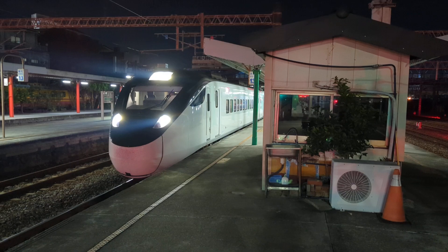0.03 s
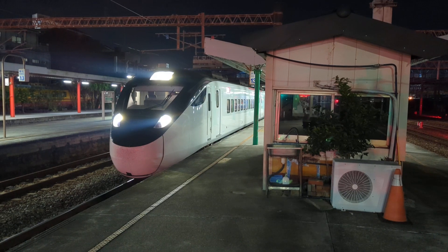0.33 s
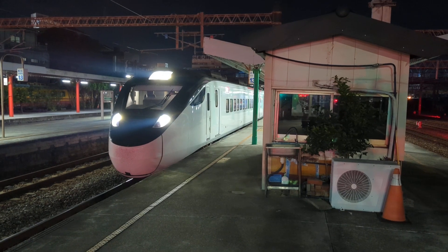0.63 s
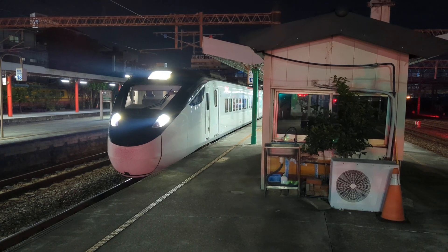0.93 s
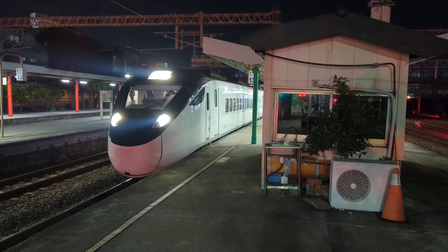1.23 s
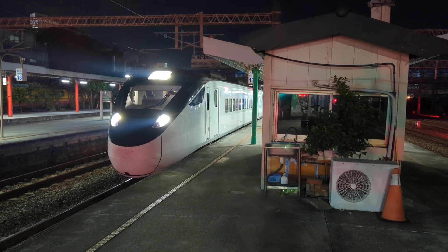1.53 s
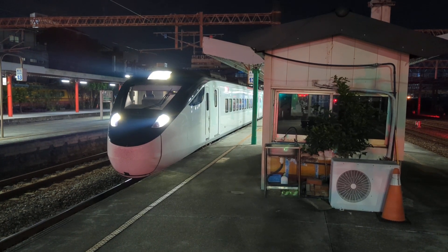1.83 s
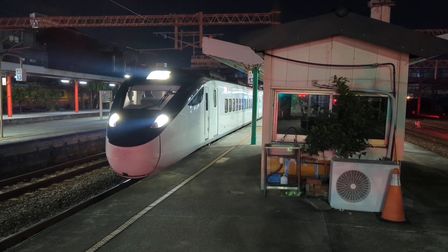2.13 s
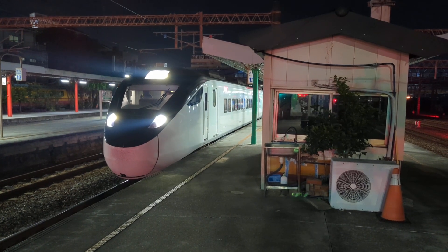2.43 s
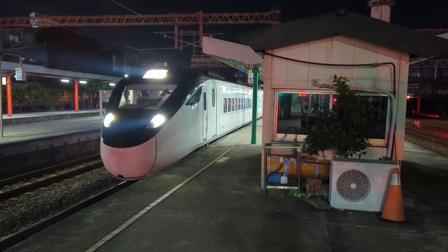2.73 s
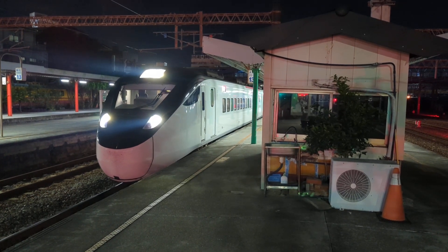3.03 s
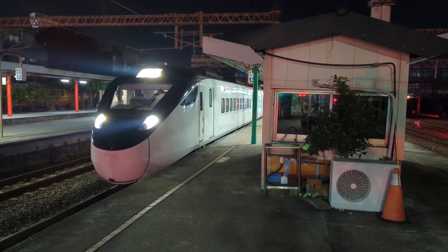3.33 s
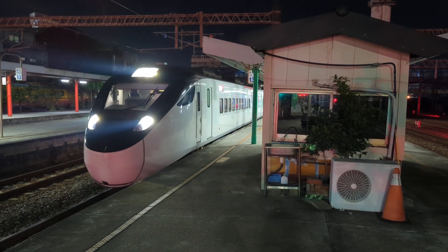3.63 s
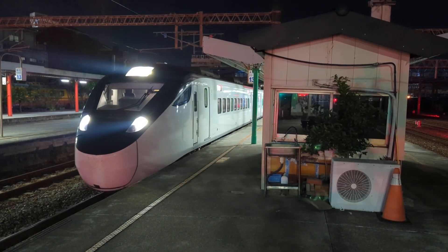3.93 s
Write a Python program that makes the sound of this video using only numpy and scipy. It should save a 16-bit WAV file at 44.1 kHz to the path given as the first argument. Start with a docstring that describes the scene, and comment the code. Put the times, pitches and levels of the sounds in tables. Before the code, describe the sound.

An electric train rumbles and hums at a platform, its cooling fans rushing throughout. A thin air leak starts near 0.8 seconds. At about 1.7 seconds the brakes release in a bright hiss with falling whistles, joined by brief high squeals and a light echo, fading by 2.8 seconds. A soft whine swells around 3 seconds, a small hiss follows near 3.4, and an insect pulses very faintly behind everything.

```python
"""First comes the rumble and hum of an electric train, starting to pull away from a night platform.
A fine leak of air opens, then the brakes release in a hiss full of whistles that fall with the pressure.
A few high squeals ring on in the brake gear, and the platform roof answers whistles and squeals.
Behind it all, cooling fans rush, a whine swells and an insect chirps beside the track."""
import sys
import numpy as np
from scipy import signal
from scipy.fft import rfft, irfft, next_fast_len
from scipy.io import wavfile
from scipy.ndimage import uniform_filter1d, map_coordinates

SR = 44100
rng = np.random.default_rng(int(sys.argv[2]) if len(sys.argv) > 2 else 0)


def store_wav(level_fs):
    """Save 16-bit WAV to argv[1]."""
    pcm = np.round(np.clip(np.atleast_2d(level_fs), -1, 1) * 32767)
    wavfile.write(sys.argv[1], SR, pcm.T.astype(np.int16))


N = 176400

# Tone colour of each noise layer: frequency_hz, relative_db
JET_COLOUR = [(2500, -6), (4000, -19), (5200, -23), (6200, 1), (7200, 2.5), (7900, -11), (8900, -0.5),
              (9700, -22), (15000, -11)]
SPRAY_COLOUR = [(2500, -8), (3700, 3), (4400, 4.5), (5500, 8.5), (8000, -3), (10200, 0.5), (11200, 2),
                (13500, 4), (15500, -12)]
LEAK_COLOUR = [(3000, -10), (6000, 2.5), (8500, 1.5), (9700, -1), (10250, 4), (10800, -4.5), (11500, -2),
               (12200, -4), (13800, -4), (15000, 5.5), (15800, -9)]
RUMBLE_COLOUR = [(38, -5.5), (52, -10.5), (85, -8), (115, -2.5), (150, -7.5), (180, -3), (225, -6),
                 (260, -7.5), (350, -11), (400, -16), (470, -18.5), (550, -26), (800, -37), (1500, -80)]
FAN_COLOUR = [(450, -10), (560, -8), (780, -3), (1060, -3.5), (1530, -9.5), (1850, -4.5), (2120, -4),
              (2400, -11.5), (2850, -15.5), (3600, -21), (4300, -18.5), (5400, -32.5), (7800, -35),
              (13000, -70)]
HISS_COLOUR = [(3000, -44), (5400, -13.5), (6300, -0.5), (7200, 4.5), (7900, -11.5), (8700, -9),
               (9500, -14), (11000, -18.5), (15500, -20)]
# Fader ride of each layer, ahead of any trim: time_s, level_db
JET_RIDE = [(1.55, -78), (1.68, -50.5), (1.77, -42), (1.9, -40.5), (2.15, -45.5), (2.3, -51), (2.55, -58.5),
            (2.85, -65)]
SPRAY_RIDE = [(1.68, -80), (1.8, -53.5), (2.0, -45), (2.15, -44), (2.3, -50.5), (2.55, -60.5), (2.8, -69)]
LEAK_RIDE = [(.8, -73), (.87, -64), (1.25, -59), (1.65, -57.5), (2.3, -71), (2.7, -64), (3.28, -76),
             (3.36, -62.5), (3.5, -67), (3.65, -84), (4, -80)]
RUMBLE_RIDE = [(0.12, -44), (0.17, -45), (0.63, -46), (0.76, -45), (3.94, -42.5), (4.0, -44.5)]
FAN_RIDE = [(0.12, -54), (0.14, -52), (1.21, -49), (3.85, -47.5), (4.0, -48)]
MOTOR_RIDE = [(.1, -52), (.75, -50), (1.0, -43), (1.27, -39.5), (1.52, -42), (1.67, -36.5), (1.85, -42),
              (2.1, -43), (2.32, -37.5), (2.5, -44), (2.63, -38.5), (2.85, -44), (3.25, -44), (3.45, -53)]
DRONE_RIDE = [(.1, -49.5), (.55, -42), (1.0, -48), (2.0, -50), (2.5, -44), (3.3, -52), (4, -46)]
THROB_RIDE = [(.1, -54), (1.0, -56), (1.4, -59), (2.1, -49), (2.6, -65), (4, -58)]
WHINE_RIDE = [(.1, -85), (2.2, -62), (3.1, -56.5), (4, -59)]
# Whistles in the escaping air: start_s, end_s, first_hz, middle_hz, last_hz, level_db, width_hz
WHISTLE_GLIDES = [ (1.63, 1.97, 7800, 6450, 7100, -56.5, 55), (1.68, 2.02, 9500, 8950, 8650, -53.5, 57),
                  (1.7, 2.02, 2850, 2600, 2500, -56, 40), (1.72, 2.34, 7400, 6700, 5950, -46.5, 130),
                  (1.7, 2.06, 6400, 5600, 4850, -53, 300), (1.82, 1.99, 5050, 4500, 4080, -53.5, 80),
                  (1.93, 2.26, 5150, 4420, 4130, -50, 80), (1.96, 2.32, 13750, 12950, 12100, -52, 200),
                  (1.8, 2.02, 13400, 13650, 13700, -56, 260), (1.96, 2.3, 8250, 7750, 7250, -53, 80),
                  (2.03, 2.65, 5100, 4600, 4400, -54, 260), (2.28, 2.61, 7150, 6800, 5950, -51, 140),
                  (2.17, 2.62, 14900, 13800, 13100, -61, 330), (2.5, 2.7, 13000, 11750, 11400, -62, 330), ]
# Brake gear resonances: start_s, hold_s, pitch_hz, level_db
SQUEAL_NOTES = [(1.71, .04, 2560, -54), (1.61, .04, 8880, -63), (2.19, .05, 12480, -56),
                (2.24, .06, 11655, -43), (2.352, .02, 11645, -46), (2.24, .08, 7180, -49),
                (2.345, .04, 7020, -48), (2.18, .16, 5830, -56), (2.36, .16, 8820, -61),
                (2.2, .4, 4250, -61), (2.05, .08, 6445, -51), (2.57, .06, 5760, -57),
                (2.53, .32, 5320, -65), (2.0, .16, 10210, -60)]
# Steady machine tones: pitch_hz, width_hz, level_db
MACHINE_BANDS = [(708.4, 25, -65.5), (1803, 30, -65), (2520, 120, -69)]
# Voices of the whine: pitch_hz, width_hz, relative_db
WHINE_BANDS = [(1047, 24, 2), (3208, 220, -5.5)]
# Stereo image of the noise layers (1 is mono): frequency_hz, correlation
AIR_IMAGE = [(2000, 0.15), (12000, 0.19)]
RUMBLE_IMAGE = [(40, .92), (130, .96), (280, .95), (550, .8)]
FAN_IMAGE = [(600, 0.63), (1000, 0.44), (2000, 0.13), (6000, 0.22)]
# Balance of the whole mix: frequency_hz, left_minus_right_db
BALANCE = [(300, 0), (900, .7), (2000, -1.4), (5000, -2), (7000, -1.5), (9000, 3), (12000, .5)]

HUM_SKEW = .16  # left-right phase offset of the hums, in radians
T = np.arange(N) / SR


def amp(db):
    return 10 ** (np.asarray(db) / 20)


def unit(x):
    return x / np.sqrt(np.mean(np.abs(x) ** 2) + 1e-20)


def along(points, hz):
    """(Hz, value) points on a log axis."""
    f, v = np.transpose(points)
    return np.interp(np.log(hz + 1), np.log(f + 1), v)


def level(points):
    """Gain per sample from (s, dB) points."""
    return amp(np.interp(T, *np.transpose(points)))


def wobble(rate):
    """A smooth random curve, rate knots a second."""
    return map_coordinates(rng.standard_normal(int(N * rate / SR) + 4), [T * rate])


def filtered(x, response):
    """x times a complex response of frequency."""
    m = next_fast_len(N + SR // 4)
    return irfft(rfft(x, m) * response(np.fft.rfftfreq(m, 1 / SR)), m)[..., :N]


def rush(spectrum, alike, patchy_db):
    """Stereo noise of rms 1 with patches of random gain."""
    z = signal.stft(rng.standard_normal((2, N)), nperseg=512)[2]
    field = uniform_filter1d(uniform_filter1d(rng.standard_normal(z.shape[1:]), size=3, axis=0),
                             size=16, axis=1)
    pair = signal.istft(z * amp(patchy_db * unit(field)), nperseg=512)[1][:, :N]
    turn = lambda hz: np.arccos(np.clip(along(alike, hz), -1, 1)) / 2
    low_cut = lambda hz: np.minimum(1, hz / spectrum[0][0]) ** 7
    mid, side = filtered(pair, lambda hz: low_cut(hz) * amp(along(spectrum, hz))
                         * [np.cos(turn(hz)), np.sin(turn(hz))])
    return unit(np.array([mid + side, mid - side]))


def narrow(pitch, width_hz):
    """Stereo narrow-band noise of rms 1 around a pitch given per sample."""
    knots = rng.standard_normal((4, 8192))
    at = np.arange(len(pitch)) * width_hz / SR
    a, b, c, d = [map_coordinates(k, [at], mode="wrap") for k in knots]
    return unit((np.array([a + 1j * b, c + 1j * d]) * np.exp(2j * np.pi * np.cumsum(pitch) / SR)).real)


def brake_release():
    """Air bursts from the brakes: a jet first, with a broader spray peaking just behind it."""
    jet = level(JET_RIDE) * rush(JET_COLOUR, AIR_IMAGE, patchy_db=2)
    spray = level(SPRAY_RIDE) * rush(SPRAY_COLOUR, AIR_IMAGE, patchy_db=2)
    return jet + spray


def whistles(skirt_db=-6.5, flutter_db=2.5, fade_share=0.39):
    """Whistles swell and mostly slide down as the pressure falls: each a core in a breathy skirt."""
    out = np.zeros((2, N))
    for start_s, end_s, *glide_hz, level_db, width_hz in WHISTLE_GLIDES:
        on = (T >= start_s) & (T < end_s)
        progress = (T[on] - start_s) / (end_s - start_s)
        pitch_hz = np.polyval(np.polyfit([0, .5, 1], glide_hz, 2), progress)
        pitch_hz *= 1 + 0.009 * wobble(45)[on]  # turbulence shakes the pitch
        swell = np.sin(np.pi / 2 * np.clip(np.minimum(progress, 1 - progress) / fade_share, 0, 1))
        voice = narrow(pitch_hz, width_hz) + amp(skirt_db) * narrow(pitch_hz, 3.5 * width_hz)
        out[:, on] += swell * amp(level_db + flutter_db * wobble(30.15)[on]) * voice
    return out


def squeals(attack_s=0.008, t60_s=0.09, flutter_db=1.3, width_hz=22):
    """Resonances of the brake gear catch, hold their pitch and ring out."""
    out = np.zeros((2, N))
    for start_s, hold_s, pitch_hz, level_db in SQUEAL_NOTES:
        age_s = T - start_s
        decay_db = 60 * np.maximum(age_s - hold_s, 0) / t60_s
        envelope = np.clip(age_s / attack_s, 0, 1) * amp(level_db - decay_db)
        drift = np.array([wobble(2 * width_hz), wobble(2 * width_hz)])
        out += envelope * amp(flutter_db * wobble(50)) * np.sin(2 * np.pi * pitch_hz * T + drift)
    return np.sqrt(2) * out


def air_leak():
    """A fine leak of air: a thin, bright hiss that comes and goes."""
    return level(LEAK_RIDE) * rush(LEAK_COLOUR, AIR_IMAGE, patchy_db=1.8)


def train_rumble(trim_db=3.5):
    """The train's machinery lays down a deep, nearly mono bed."""
    return level(RUMBLE_RIDE) * amp(trim_db) * rush(RUMBLE_COLOUR, RUMBLE_IMAGE, patchy_db=0.57)


def cooling_fans(trim_db=1.5):
    """Fans push air in a wide midrange wash that slowly builds."""
    return level(FAN_RIDE) * amp(trim_db) * rush(FAN_COLOUR, FAN_IMAGE, patchy_db=0.94)


def hum(hz, points, waver_db):
    """A slightly unsteady sine on a fader ride; standing waves skew its left-right phase."""
    phase = 2 * np.pi * hz * T + 0.21 * wobble(4.25) + HUM_SKEW * np.array([[.5], [-.5]])
    return np.sqrt(2) * level(points) * amp(waver_db * wobble(7.78)) * np.sin(phase)


def electrical_gear():
    """The electrical gear hums on three low notes, each swelling in its own time."""
    motor = hum(hz=115.1, points=MOTOR_RIDE, waver_db=0.76)
    drone = hum(hz=67.9, points=DRONE_RIDE, waver_db=0.5)
    throb = hum(hz=57.1, points=THROB_RIDE, waver_db=1.0)
    return motor + drone + throb


def machine_whine():
    """The machinery sings in grainy tones of fixed pitch: some steady, two swelling into a whine."""
    steady = sum(amp(db) * narrow(np.full(N, hz), width) for hz, width, db in MACHINE_BANDS)
    whine = sum(amp(db) * narrow(np.full(N, hz), width) for hz, width, db in WHINE_BANDS)
    return steady + level(WHINE_RIDE) * whine


def insect(pitch_hz=7130, half_width_hz=400, rate_hz=9.47, peak_s=0.1, level_db=-69.5, swing_db=6.5):
    """An insect chirps in a thin, high band that pulses evenly."""
    beat = np.cos(2 * np.pi * rate_hz * (T - peak_s))
    return amp(level_db + swing_db * beat) * narrow(np.full(N, pitch_hz), 2 * half_width_hz)


def treble_bed(level_db=-67):
    """A faint, steady hiss behind everything."""
    return amp(level_db) * rush(HISS_COLOUR, AIR_IMAGE, patchy_db=1)


def roof(send, t60_s=0.84, return_db=-8):
    """The platform roof and walls scatter the sound into a diffuse tail."""
    tail = rng.standard_normal((2, SR)) * amp(-60 * T[:SR] / t60_s)
    tail /= np.linalg.norm(tail[0])
    return amp(return_db) * signal.fftconvolve(send, tail, axes=1)[:, :N]


def scene():
    """Brake sounds and their echo over the train and the night, panned by frequency."""
    tonal = whistles() + squeals()
    brakes = air_leak() + brake_release() + tonal + roof(tonal)
    machinery = train_rumble() + cooling_fans() + electrical_gear() + machine_whine()
    everything = brakes + machinery + treble_bed() + insect()
    return filtered(everything, lambda hz: amp(np.outer([.5, -.5], along(BALANCE, hz))))


def record(dry):
    """A quick fade-in, the left channel a hair early, and a hard cut of the top end."""
    start_s, fade_s, left_lead_s, high_cut_hz = 0.045, 0.048, 0.00009, 15740
    faded = dry * np.clip((T - start_s) / fade_s, 0, 1)
    left_lead = lambda hz: np.exp(1j * np.pi * left_lead_s * np.outer([1, -1], hz))
    return filtered(faded, lambda hz: left_lead(hz) * (hz < high_cut_hz))


dry = scene()
out = record(dry)
store_wav(out)
```